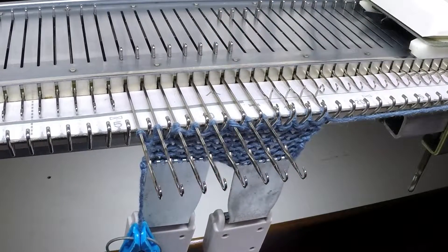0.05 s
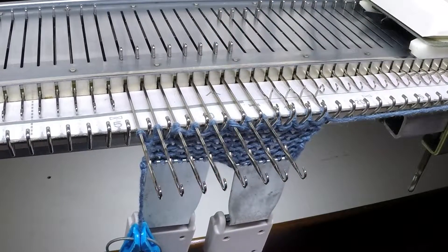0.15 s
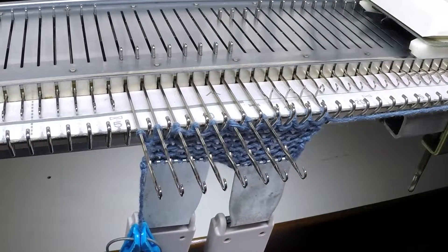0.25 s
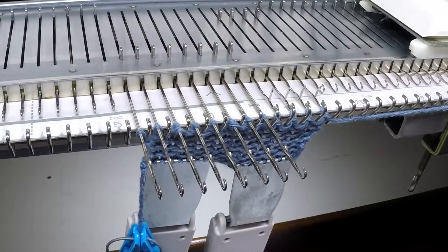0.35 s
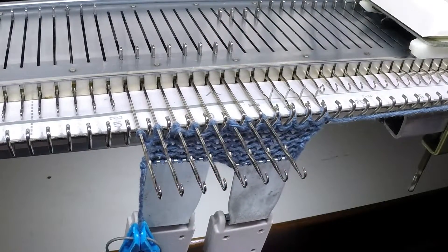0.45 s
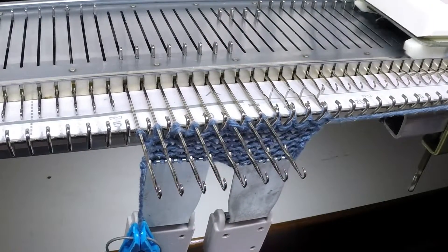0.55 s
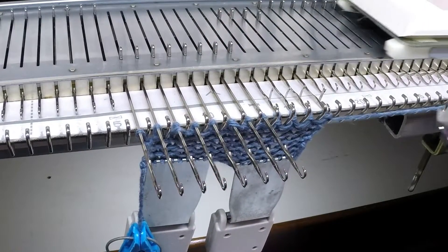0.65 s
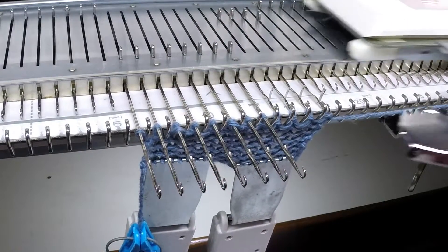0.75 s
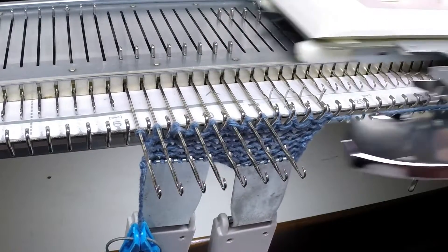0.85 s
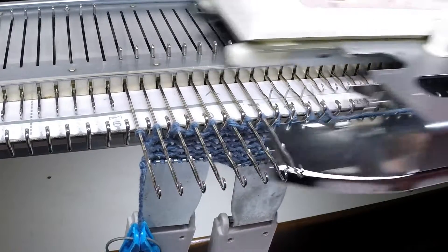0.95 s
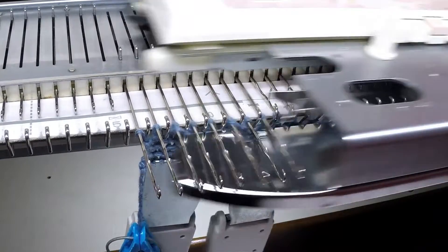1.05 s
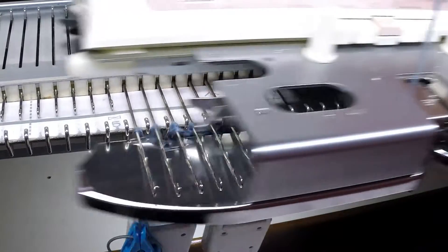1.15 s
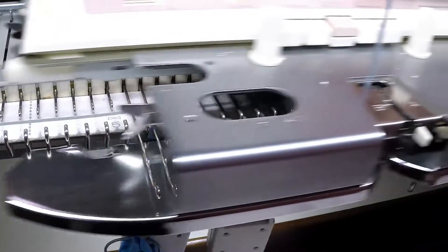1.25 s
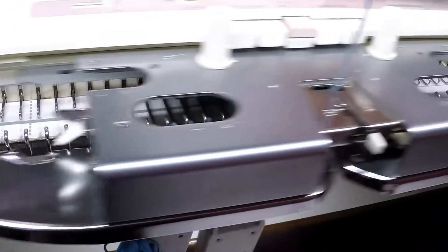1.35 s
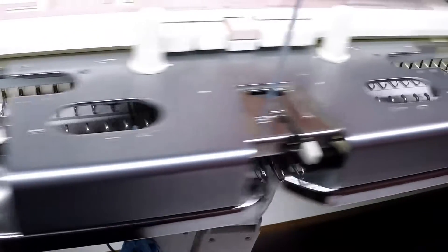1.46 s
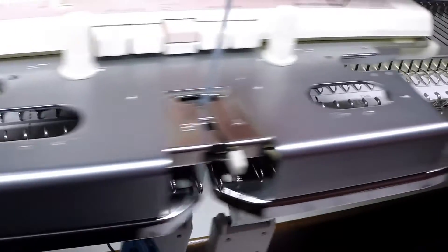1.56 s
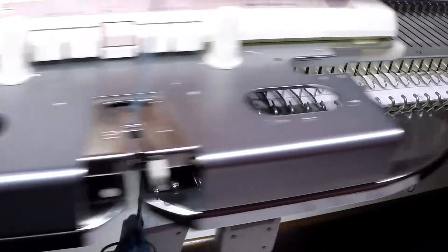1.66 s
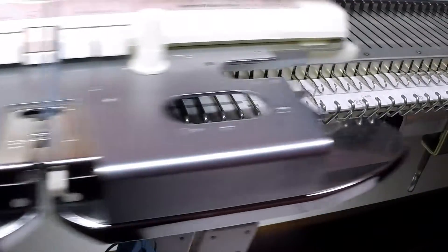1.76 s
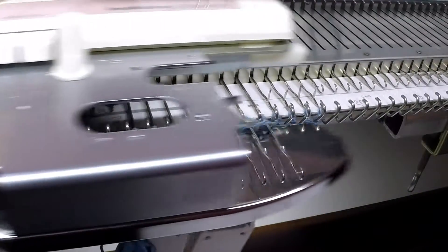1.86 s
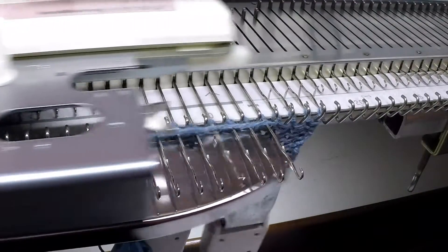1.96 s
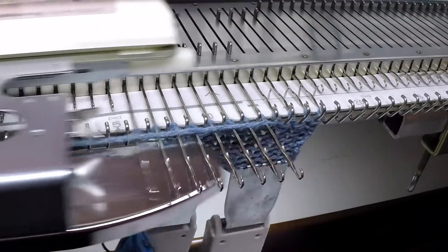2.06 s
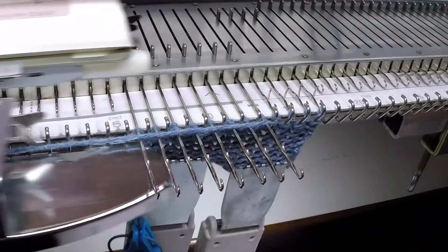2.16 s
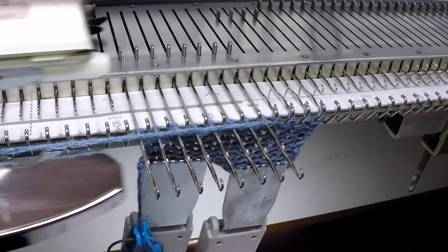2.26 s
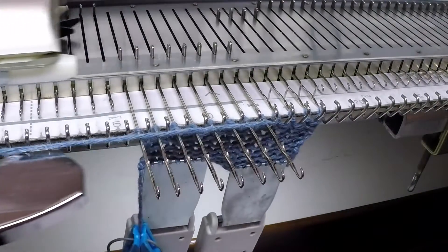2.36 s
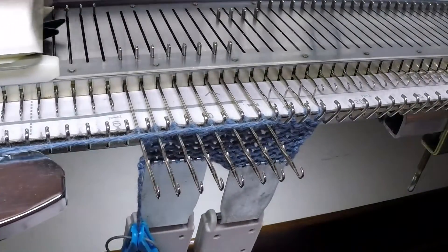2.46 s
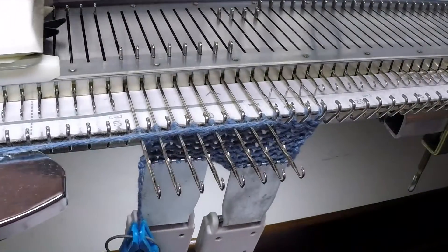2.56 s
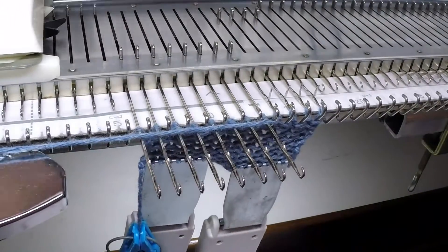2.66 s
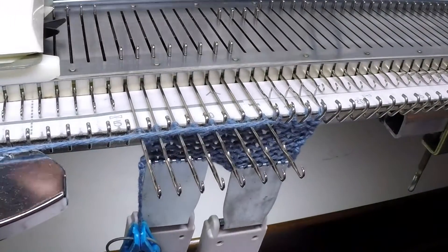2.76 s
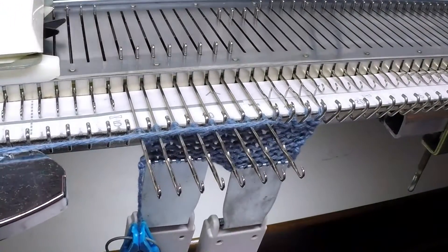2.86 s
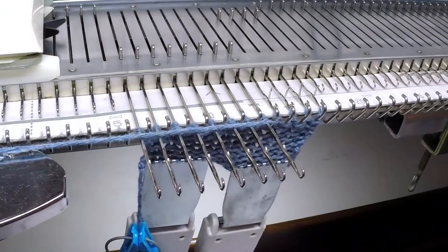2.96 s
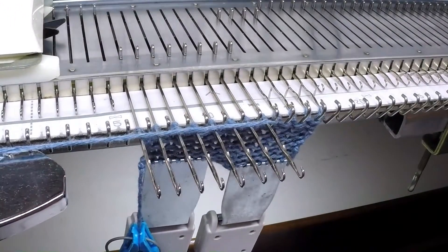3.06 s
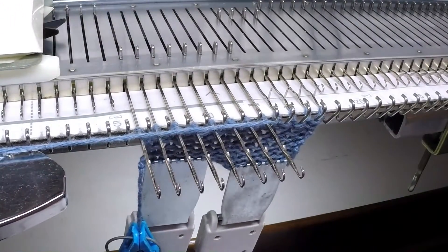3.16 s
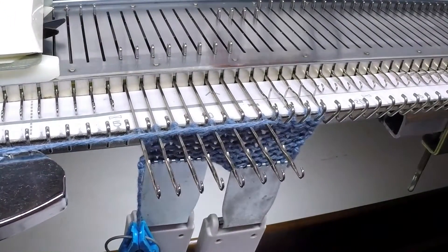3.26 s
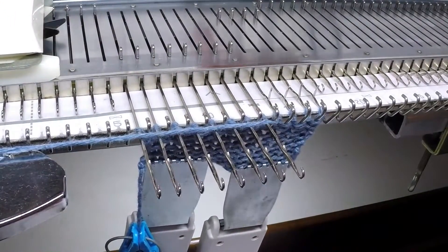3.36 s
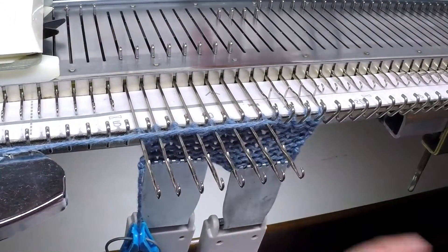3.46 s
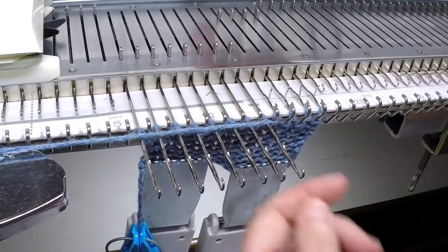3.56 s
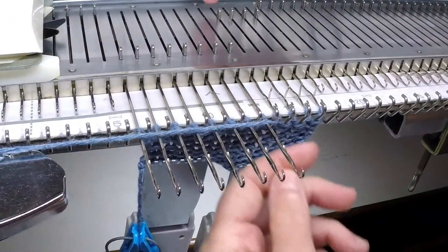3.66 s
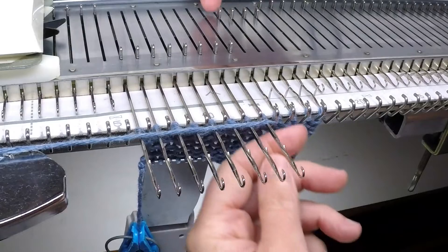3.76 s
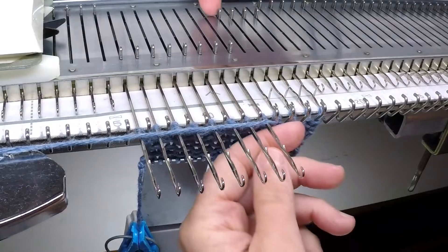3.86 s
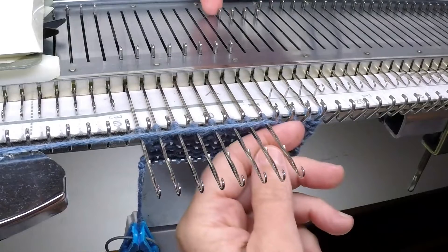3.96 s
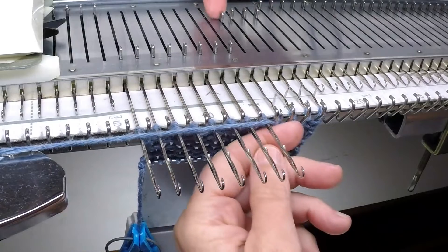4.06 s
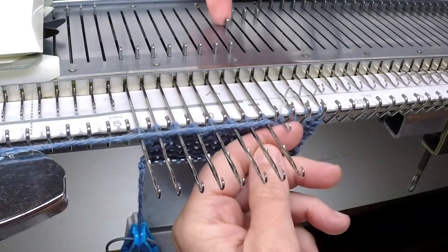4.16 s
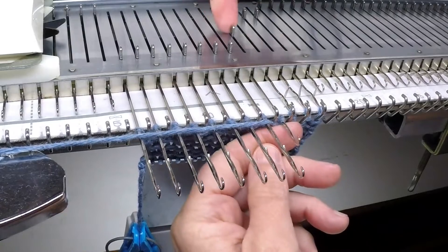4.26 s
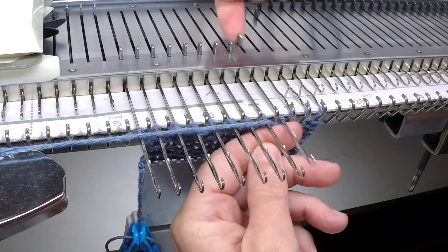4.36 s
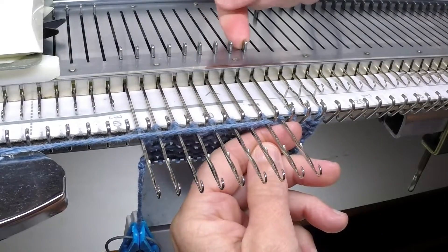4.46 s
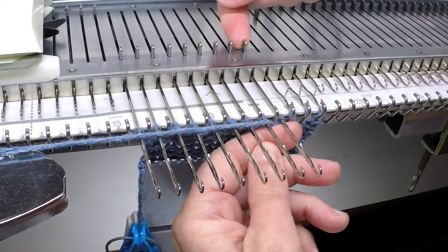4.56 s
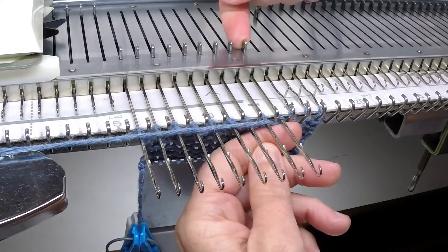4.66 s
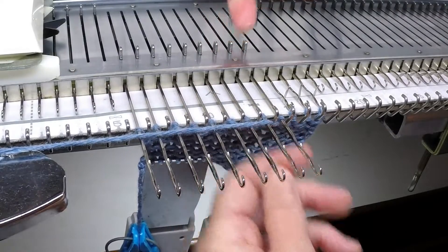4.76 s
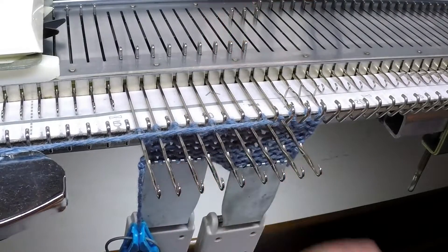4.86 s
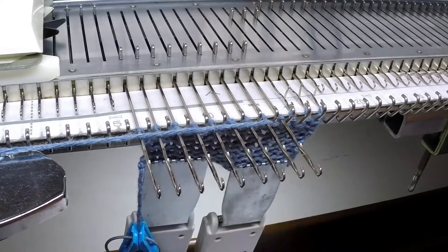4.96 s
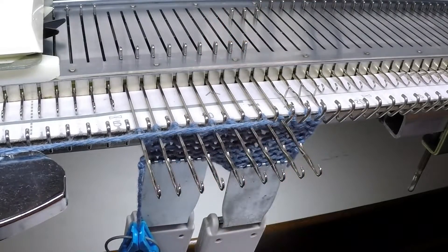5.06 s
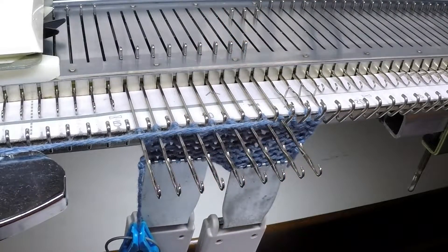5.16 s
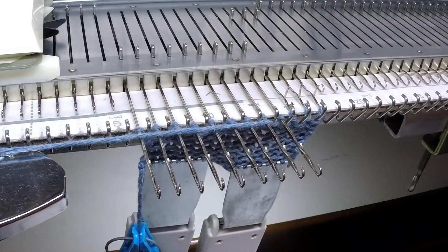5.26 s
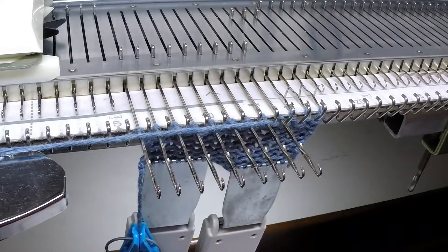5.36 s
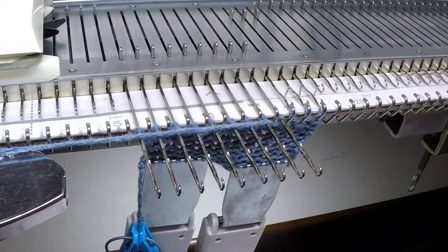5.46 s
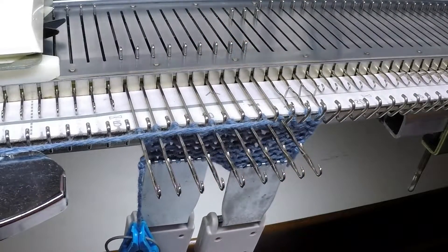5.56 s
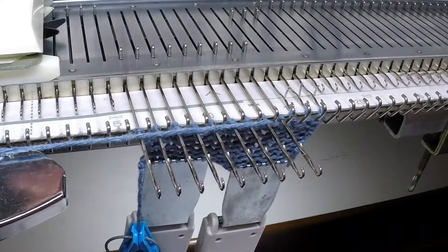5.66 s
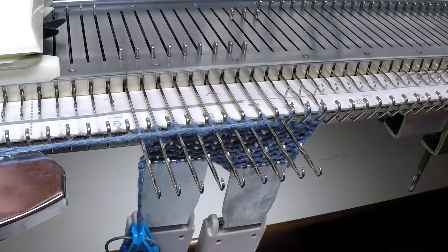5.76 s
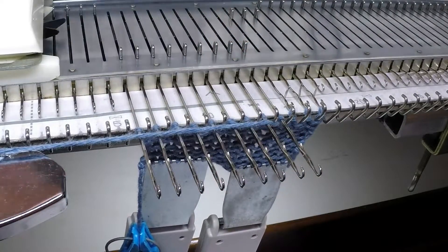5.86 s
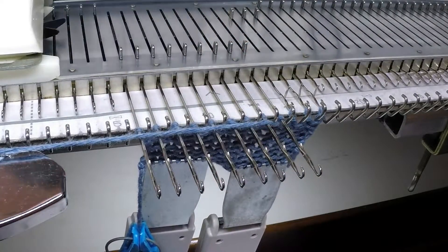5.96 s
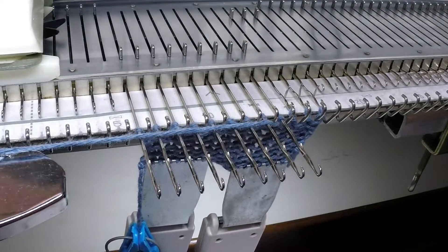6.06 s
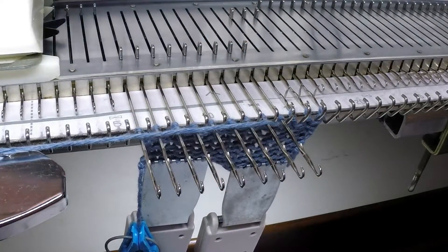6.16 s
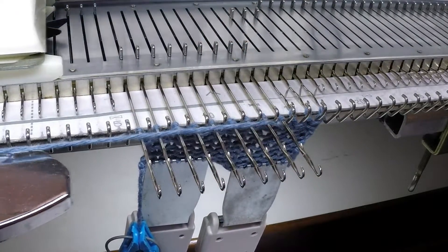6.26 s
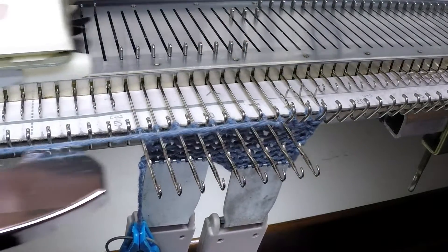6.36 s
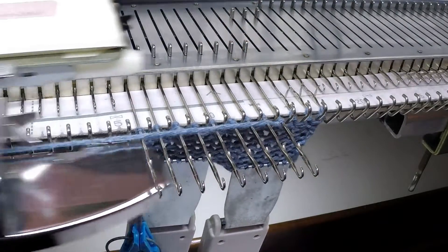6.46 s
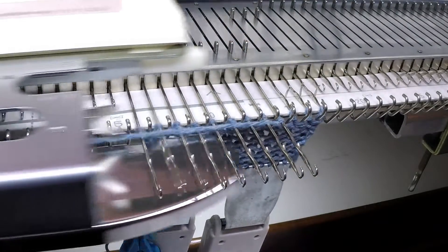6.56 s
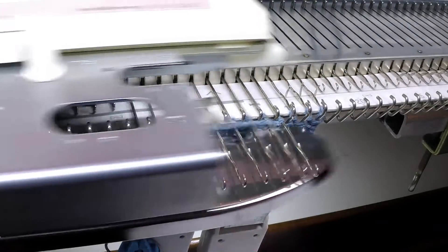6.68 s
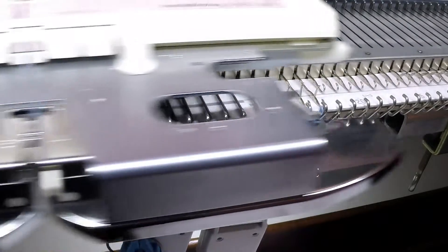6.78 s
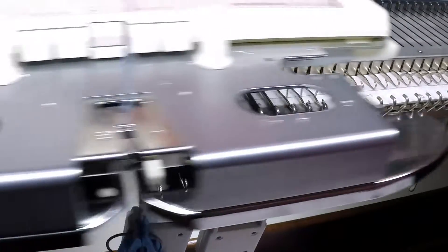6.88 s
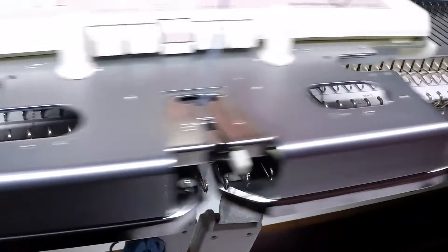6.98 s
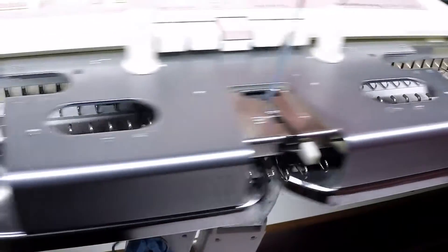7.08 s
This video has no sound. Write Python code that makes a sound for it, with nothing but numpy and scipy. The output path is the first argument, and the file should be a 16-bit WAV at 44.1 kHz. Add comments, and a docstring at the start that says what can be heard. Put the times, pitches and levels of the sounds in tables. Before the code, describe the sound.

Close to the microphone indoors, a hand-pushed carriage rubs faintly on its rail, then clatters over steel needles in a fast, bright metallic rattle with hollow booms and singing bed. It thins to small ticks. In the quiet room a sleeve brushes faintly and a few soft clicks lead to one sharp needle flick. After a pause the carriage starts back, rattling until the end.

```python
"""A hand pushes a knitting carriage along a steel needle bed, close to the microphone, rests it, and pushes it back.
Cams knock the needles one after another; each knock is a crack, two needle rings, a wash of bed modes
and a boom of the hollow carriage shell. Random ticks, singing bands of noise and brushed hooks fill the passes.
Between the passes a finger flicks single needles forward. Behind it all the table shakes, a sleeve brushes
and a quiet room rumbles: all three are shaped noise."""
import sys
import numpy as np
from scipy import signal
from scipy.io import wavfile
from scipy.ndimage import uniform_filter1d

SR = 44100
rng = np.random.default_rng(int(sys.argv[2]) if len(sys.argv) > 2 else 0)


def to_wav(s):
    """Save 16-bit WAV."""
    ch = np.atleast_2d(s).T  # columns
    pcm = np.round(np.clip(ch, -1, 1) * 32767)  # PCM
    wavfile.write(sys.argv[1], SR, pcm.astype(np.int16))


N = 313992  # length in samples

# All table levels are relative: each layer may add its own trim.
# Needle knocks: t/s, level/dB, low ring f/Hz, high ring f/Hz, bed clack level/dB, low ring level/dB
# (the last two are counted from the level of the knock)
KNOCKS = [(0.678, -38, 3120, 8750, -9, -12), (0.707, -40, 1210, 7530, -16, -8),
          (0.7292, -42.5, 3100, 6500, -5, -3), (0.7801, -43, 2760, 6500, -5, -1),
          (0.9302, -29.5, 2330, 7600, -8.5, -11), (0.9939, -8, 3610, 5900, -15.5, -12),
          (1.0332, -13.5, 1650, 6840, -17.5, -10), (1.0425, -9.5, 3380, 6840, -15, -16),
          (1.061, -7, 1750, 8100, -15.5, -10), (1.1087, -8, 3500, 5710, -21, -12),
          (1.1308, -10, 3320, 4470, -20, -4), (1.1494, -8, 1580, 8200, -14.5, -12),
          (1.1709, -9, 3300, 8160, -13.5, -6), (1.1905, -8.5, 3300, 6630, -15, -11),
          (1.213, -7.5, 2840, 6900, -14, -13), (1.2306, -9, 3290, 9160, -11.5, -8),
          (1.2375, -7.5, 3130, 7850, -22, -10), (1.257, -1.5, 2280, 8300, -15, -16),
          (1.2772, -8, 2830, 8600, -13, -8), (1.285, -5, 3290, 8370, -28, -10),
          (1.3074, -7, 3260, 5690, -16, -10.5), (1.3177, -8, 3010, 8400, -15, -6),
          (1.338, -10, 1290, 8100, -16, -5), (1.3677, -8.5, 3200, 7800, -16.5, -3),
          (1.4014, -8.5, 2980, 5650, -18.5, -4), (1.433, -10.5, 3160, 7000, -26, -0.5),
          (1.4462, -12, 3200, 8000, -19, -13), (1.4682, -6, 3700, 7400, -19, -13),
          (1.4815, -3.5, 3770, 8400, -20, -13), (1.4993, -17, 2130, 8500, -28, -6),
          (1.5264, -7.5, 2640, 8690, -16, -12), (1.5547, -8.5, 1230, 7620, -8.5, -18),
          (1.6127, -7.5, 2350, 6000, -15, -24), (1.6432, -7.5, 3630, 5760, -18, -19),
          (1.6724, -10, 2190, 7740, -16, -8), (1.712, -3.5, 2130, 3980, -19.5, -3.5),
          (1.728, -7.5, 1470, 6620, -16, -11), (1.7582, -8.5, 1525, 8100, -17, -9),
          (1.8009, -14, 2620, 9500, -26, -10), (1.8205, -7.5, 1425, 8300, -13.5, -9.5),
          (1.8442, -8.5, 1460, 7490, -19, -11), (1.8684, -12.5, 1284, 8600, -12, -3.5),
          (1.8956, -9.5, 1480, 7550, -13.5, -11), (1.92, -19, 2640, 8850, -21, 2),
          (1.952, -17, 2770, 8000, -11, -4), (1.9793, -14, 2710, 5360, -20, -13),
          (2.0035, -13.5, 3540, 4570, -20, -7), (2.0314, -16, 3060, 4470, -16, -9),
          (2.0584, -15, 3010, 4420, -22, -10), (2.0833, -16, 3060, 4450, -17, -8),
          (2.1143, -14.5, 2780, 5700, -17.5, -13), (2.135, -13.5, 3140, 7680, -20, -15),
          (2.144, -19.5, 3600, 7490, -19, -7), (2.166, -19.5, 3510, 7170, -13.5, -14),
          (2.247, -36, 3500, 3970, -4, -11), (2.2596, -24.5, 2270, 7870, -12, -1.5),
          (2.3028, -44, 1910, 8470, -9, -4), (2.3287, -41, 1660, 6580, -10, 0),
          (2.377, -40, 2120, 5500, -9.5, -5), (2.4663, -45.5, 2930, 5070, -4.5, 0),
          (2.5244, -48, 1980, 6100, -14, -5), (2.6234, -36, 1598, 8930, -10, -5),
          (3.761, -50, 2470, 4910, -3.5, -8.5), (4.138, -34, 1495, 4060, -13, -9.5),
          (4.2885, -42.5, 1350, 7640, -12.5, -8), (4.4066, -50, 1256, 4870, -12.5, -7),
          (4.485, -13, 2565, 8220, -13, -7), (6.4388, -40.5, 3140, 8390, -9, -10),
          (6.557, -29.5, 3230, 4900, -11.5, -9), (6.5994, -24.5, 3460, 4700, -13.5, 0),
          (6.6334, -6, 3110, 7860, -20.5, -9), (6.6575, -8, 3040, 7740, -18.5, -11),
          (6.6831, -9.5, 2980, 8110, -33, -16), (6.7052, -9, 3050, 7520, -18.5, -14),
          (6.7279, -10.5, 2860, 7640, -22, -8), (6.7501, -7.5, 2710, 7700, -20, -17),
          (6.769, -9, 2550, 9080, -21, -17), (6.7898, -8, 2450, 7840, -18, -15),
          (6.8438, -17.5, 2430, 7370, -12, -12), (6.8741, -14.5, 1710, 7400, -11, 0),
          (6.896, -10.5, 2544, 9320, -12, -7), (6.9224, -17, 2600, 4030, -10, -6),
          (6.9476, -16.5, 2550, 9400, -14, -8), (6.9718, -15, 2570, 5390, -6.5, -8),
          (6.9976, -14, 2650, 4470, -10.5, -8), (7.0232, -16, 1250, 4550, -8, -9),
          (7.0489, -13.5, 2410, 8100, -8, -7), (7.0749, -7.5, 2540, 5900, -12, -2),
          (7.1044, -14, 2630, 8100, -15, 1)]
# Carriage in motion, one list for each pass: t/s, rattle level/dB, shell level/dB
PASSES = [
    [(0.5, -72, -80), (0.74, -55, -59), (0.99, -51.5, -46.5), (0.998, -43.5, -41), (1.07, -23, -37),
     (1.143, -26, -42), (1.25, -22.5, -38), (1.43, -26.5, -44), (1.577, -21.5, -32), (1.866, -28.5, -31.5),
     (1.94, -32, -39.5), (2.155, -38.5, -37), (2.3, -59, -58.5), (2.4, -63.5, -55.5), (2.615, -67, -68),
     (2.63, -75, -46), (2.75, -83, -70.5)],
    [(6.25, -78.5, -72.5), (6.553, -54, -58), (6.56, -41, -46.5), (6.628, -36, -45), (6.636, -37, -30),
     (6.72, -34.5, -31.5), (6.841, -28.5, -31), (6.91, -28, -30.5), (6.978, -27.5, -29.5),
     (7.115, -23.5, -32)],
]
# Colour of the dense wash of steel modes: f/Hz, level per Hz/dB
STEEL_COLOUR = [(380, -34), (650, -0.5), (742, -15.5), (869, -9), (1100, -6), (1290, -13), (1920, -6),
                (2160, -10), (3220, -9.5), (4250, -9.5), (8010, -5.5), (9380, -7.5), (11000, -24.5),
                (15300, -13)]
# How long that wash lasts, before each layer shortens it: f/Hz, 60 dB decay time/s
STEEL_DECAY = [(700, 0.25), (2100, 0.15), (5500, 0.089), (14600, 0.072)]
# Clearest modes of the needle bed: f/Hz, level/dB, 60 dB decay time/s (later capped and shortened)
BED_MODES = [(910, -19.5, .14), (1080, -17, 0.078), (1296, -2, 0.14), (1514, 2, 0.24), (2280, -7, .12),
             (2570, 0.5, 0.11), (2840, -1, 0.077), (2980, 3.5, 0.036), (3040, -11.5, 0.068),
             (3590, -1.5, .1), (3950, -6.5, 0.27), (4550, -2, 0.0817), (5050, -17, .07), (5850, 3, 0.054),
             (5680, 4, 0.037), (6440, -21, 0.077), (7700, -3, .06), (7100, -2, 0.059), (7880, 4, 0.037),
             (7750, 3.5, .07), (8550, 4.5, 0.058), (8790, -7.5, 0.07)]
# Modes of the hollow carriage shell: f/Hz, level/dB, 60 dB decay time/s
SHELL_MODES = [(420, -4, .09), (441, 0, .11), (468, -2, .09), (500, -2, .1), (545, -7, .08)]
# Band the shell is heard in: lower edge f/Hz, upper edge f/Hz
SHELL_BAND = [370, 700]
# Sinker plate singing as it rubs over the needles: t/s, level/dB, pitch f/Hz
PLATE_SONG = [
    [(1.1, -33, 3240), (1.306, -29.5, 3120), (1.46, -31, 3150)],
    [(1.93, -41, 2970), (2.13, -34, 3050), (2.26, -45.5, 3544)],
    [(6.33, -87, 3040), (6.358, -64.5, 3040), (6.553, -51, 3080), (6.56, -44, 3130), (6.6, -41, 3064),
     (7.12, -26, 2668)],
]
# Bed humming under the yarn feeder: t/s, level/dB, pitch f/Hz
FEEDER_SONG = [
    [(1.0, -33, 1428), (1.14, -37.5, 1400), (1.27, -17.5, 1290), (1.43, -37, 1300), (1.58, -24, 1323),
     (1.74, -26.5, 1479), (1.88, -30, 1424), (1.93, -38, 1329)],
    [(6.63, -35, 1634), (6.86, -38.5, 1594), (6.89, -33, 1648), (7.12, -30, 1416)],
]
# Latch brushes dragging over the needle hooks: t/s, level/dB
BRUSH_DRAG = [
    [(1.94, -39.5), (2.16, -42.5), (2.26, -63)],
    [(6.56, -52), (6.64, -42.5), (7.12, -47)],
]
# Rings of the brushed hooks: f/Hz, width f/Hz, level/dB
HOOK_RINGS = [(4450, 300, -0.042), (5440, 170, -1), (7560, 555, 0.95)]
# Empty carriage rubbing on its rail before it meets the needles: t/s, level/dB, pitch f/Hz
RAIL_SONG = [
    [(.74, -62, 2590), (.92, -57, 2450), (.985, -55, 2550)],
]
# Table shaken by the push: t/s, level/dB
TABLE_SHAKE = [
    [(0.6, -59.5), (1.28, -37), (2.7, -54)],
    [(6.4, -58.5), (6.844, -37.5), (7.12, -42.5)],
]
# Modes of the table: f/Hz, level/dB, 60 dB decay time/s
TABLE_MODES = [(72, 3, 0.26), (117, -3.5, 0.18), (165.9, -7, 0.24), (199.6, 2, 0.19)]
# Cloth of a sleeve: t/s, level/dB
SLEEVE_BRUSH = [(3.25, -78.5), (3.56, -63.5), (3.85, -75)]
# Colour of the room noise: f/Hz, level per Hz/dB
ROOM_COLOUR = [(8.8, -30), (15, 0.5), (70, -2), (93, -5), (148, -9.5), (236, -13), (387, -17.5),
               (548, -17.5), (732, -28.5), (822, -24), (2620, -30), (5110, -33), (15400, -37.5)]
# Thin steady hiss in the treble: f/Hz, width f/Hz, level/dB
TREBLE_HISS = (4980, 120, -78)

ROOM_DB = -52.5  # rms level of the room noise, without the thin treble hiss
TOP_HZ = 15270  # the whole sound stops steeply above this
# Parts of a clear knock, counted from its level; softer knocks sizzle more
HIGH_RING_DB, SIZZLE_DB, SOFT_SIZZLE_DB_PER_DB = -5, 0, 0.1782
# Small ticks: added to the clack of the last knock; top sizzle
CHATTER_CLACK_DB, CHATTER_SIZZLE_DB = 7.5, -3


def knocks():
    """The clear single knocks: a short crack, two rings of the needles and the answer of the bed."""
    seconds, db, low_hz, high_hz, clack_db, low_db = np.transpose(KNOCKS)
    at = (seconds * SR).astype(int)
    sizzle_db = SIZZLE_DB + SOFT_SIZZLE_DB_PER_DB * (db.max() - db)
    bed = steel(at, db, low_hz, high_hz, clack_db + 14.0, sizzle_db,
                dense_db=-19.0, modes_db=-29.5, focus_db=3.77, scatter_db=2.5, quick=0.94)
    crack = fade(train(at, undb(db - 12.0) ** 2), 0.0069) * hiss(7200, 8300)
    low = needles(at, low_hz, db + low_db, t60=0.056, spread=0.053)
    high = needles(at, high_hz, db + HIGH_RING_DB, t60=0.031, spread=0.02)
    return bed + crack + low + high


def needles(at, hz, db, t60, spread):
    """The struck needle and its neighbours ring as a close cluster at a pitch set by their free length."""
    length = 4096  # samples of each ring
    out, t = np.zeros(N + length), np.arange(length) / SR
    envelope = np.exp(-np.log(1000) * t / t60) * (1 - np.exp(-t / .0006))  # quick rise, then decay
    luck = rng.random((len(at), 2, 4, 1))  # detuning and phase of four needles for each knock
    for start, pitch, size, (detune, phase) in zip(at, hz, undb(db), luck):
        needle_hz = pitch * (1 + spread * (2 * detune - 1))
        cluster = np.sin(2 * np.pi * (needle_hz * t + phase)).mean(axis=0)
        out[start:start + length] += size * cluster * envelope
    return out[:N]


def steel(at, db, low_hz, high_hz, clack_db, top_db, dense_db, modes_db, focus_db, scatter_db, quick):
    """Blows on the bed: a dense wash of modes that dies by band, and the clearest modes on their own."""
    out = np.zeros(N)

    def near(hz):
        """The place of the blow favours modes close to one low and one high ring."""
        return sum(np.exp(-(np.log2(hz / centre) / .09) ** 2) for centre in (low_hz, high_hz))

    for hz in 700 * 2 ** np.arange(0, 4.55, .25):  # quarter-octave steps
        band_db = shape(STEEL_COLOUR, hz) + 10 * np.log10(hz / 4000)  # wider bands hold more power
        size_db = db + dense_db + band_db + part(hz, clack_db, top_db) + 2.3 * near(hz)
        size = undb(size_db + scatter_db * rng.standard_normal(len(at)))
        envelope = fade(train(at, size ** 2), quick * shape(STEEL_DECAY, hz))
        out += envelope * hiss(hz, hz / 5.8)

    for hz, mode_db, t60 in BED_MODES:
        size_db = db + modes_db + mode_db + part(hz, clack_db, top_db) + focus_db * near(hz)
        size = undb(size_db + scatter_db * rng.standard_normal(len(at)))
        late = rng.integers(0, 90, len(at))  # samples: the modes start slightly apart
        sign = rng.choice([-1, 1], len(at))
        out += ring(train(at + late, size * sign), hz, quick * min(t60, .13))
    return out


def part(hz, clack_db, top_db):
    """Where a blow lands sets how much low clack and top sizzle it has against the middle."""
    clack = clack_db * np.clip(np.log2(2400 / hz) / .4, 0, 1)
    sizzle = top_db * np.clip(np.log2(hz / 9500) / .2, 0, 1)
    return clack + sizzle


def rattle():
    """Loose needles, latches and brushes chatter densely under the moving cams; plate, bed and shell sing along."""
    db = track(PASSES, order=1)
    at = np.sort(rng.integers(0, N, size=3000))
    size_db = -3.0 * np.log(rng.random(len(at)) + .02)  # many small ticks, few large ones
    # small ticks ring like the last clear knock: same cam, same stretch of bed
    knock_list = np.array(KNOCKS)
    last_index = np.searchsorted(knock_list[:, 0] * SR, at) - 1
    last = knock_list[np.clip(last_index, 0, None)]
    chatter = steel(at, db[at] + size_db, last[:, 2], last[:, 3], last[:, 4] + CHATTER_CLACK_DB,
                    CHATTER_SIZZLE_DB, dense_db=-12, modes_db=-25.5, focus_db=7.7, scatter_db=3.0, quick=0.61)
    boom = shell(at, size_db)
    plate = undb(-5.0) * song(PLATE_SONG, width_hz=260, grain_db=2.1)
    feeder = undb(-8) * song(FEEDER_SONG, width_hz=265, grain_db=3.14)
    return chatter + boom + plate + feeder


def shell(at, size_db):
    """The hollow carriage booms with every clear knock and, more softly, with the small ticks."""
    seconds, db, clack_db = np.array(KNOCKS)[:, [0, 1, 4]].T
    knock = (seconds * SR).astype(int)
    ticks = train(at, undb(size_db) * rng.choice([-1, 1], len(at)))
    force = train(knock, np.full(len(knock), undb(9))) + ticks
    moving = track(PASSES, order=1) > -100
    force = force * undb(track(PASSES, order=2) - 15.5) * moving
    # a low clack reaches it through the bed, also at rest
    force = force + train(knock, undb(db + clack_db - 26.0))
    band = signal.butter(2, SHELL_BAND, "band", fs=SR, output="sos")
    return signal.sosfilt(band, body(force, SHELL_MODES))


def brushes():
    """Bristles keep the hooks ringing, and every knock shakes them up."""
    at = (np.array(KNOCKS)[:, 0] * SR).astype(int)
    jolt = 1 + 0.86 * fade(train(at, np.ones(len(at))), 0.075)
    hooks = sum(undb(db) * hiss(hz, width) for hz, width, db in HOOK_RINGS)
    return undb(track(BRUSH_DRAG, order=1) - 3.5) * jolt * hooks


def rail():
    """The empty carriage rubs on its rail: a soft band of noise that follows a pitch."""
    return song(RAIL_SONG, width_hz=419, grain_db=1.79)


def song(tables, width_hz, grain_db):
    """A rubbed part: a narrow band of noise that follows its pitch and catches unevenly."""
    noise = rng.standard_normal(N) + 1j * rng.standard_normal(N)
    slow = signal.lfilter([1], [1, -np.exp(-np.pi * width_hz / SR)], noise)
    carrier = np.exp(2j * np.pi * np.cumsum(track(tables, order=2)) / SR)  # moves the noise up to the pitch
    tone = (slow * carrier).real
    return undb(track(tables, order=1) + grain_db * walk(60)) * unit(tone)


def table():
    """The push rocks the table the machine is clamped to: noise drives a few low modes."""
    shaking = unit(body(rng.standard_normal(N), TABLE_MODES))
    return undb(track(TABLE_SHAKE, order=1) - 4.0) * shaking


def sleeve():
    """Cloth brushes softly as the hands come in: broad noise with an uneven level."""
    return undb(track([SLEEVE_BRUSH], order=1) + 2 * walk(17)) * hiss(4500, 8000)


def room():
    """Half-octave bands of rumble and hiss; the bass wanders most, the treble is smoother."""
    out, swell = 0, .8 * walk(.7)  # all bands share the swell
    for hz in 18 * 2 ** np.arange(0, 10, .5):
        steadiness = np.clip(1 - np.log(hz / 100) / 6, .2, 1)  # smaller towards the treble
        wander = (swell + 1.53 * walk(3.66)) * steadiness
        out = out + undb(shape(ROOM_COLOUR, hz) + 10 * np.log10(hz) + wander) * hiss(hz, hz / 2.82)
    hz, width, db = TREBLE_HISS
    return undb(ROOM_DB) * unit(out) + undb(db) * hiss(hz, width)


def undb(db):
    """Decibels to gain."""
    return 10 ** (np.asarray(db) / 20)


def unit(x):
    """Scale to rms 1."""
    return x / np.sqrt(np.mean(x ** 2))


def shape(curve, hz):
    """Read a table of f/Hz and value on a log-frequency axis."""
    points = np.array(curve)
    return np.interp(np.log(hz), np.log(points[:, 0]), points[:, 1])


def track(tables, order):
    """One column of timed tables for every sample; the first level falls silent outside its spans."""
    spans = []
    for t in tables:
        before = [t[0][0] - .004, -110, *t[0][2:]]
        after = [t[-1][0] + .004, -110, *t[-1][2:]]
        spans.append([before, *t, after])
    rows = np.concatenate(spans)
    return np.interp(np.arange(N) / SR, rows[:, 0], rows[:, order])


def hiss(hz, width):
    """Noise in one band, rms 1."""
    edges = [hz - width / 2, min(hz + width / 2, .49 * SR)]
    band = signal.butter(2, edges, "band", fs=SR, output="sos")
    return unit(signal.sosfilt(band, rng.standard_normal(N)))


def walk(rate):
    """Random levels held 1 / rate s and smoothed twice; spread 1."""
    k = int(SR / rate)
    steps = np.repeat(rng.standard_normal(N // k + 1), k)
    return unit(uniform_filter1d(uniform_filter1d(steps, k), k)[:N])


def train(at, size):
    """Impulses at the given samples, on a tiny offset that keeps silent filters quick."""
    return np.bincount(at, size, N)[:N] + 1e-18


def fade(power, t60):
    """Envelope of unrelated blows: powers add, build for about a millisecond and die away."""
    rise = .0008  # s
    for time in (t60 / np.log(1e6), rise):
        power = signal.lfilter([1], [1, -np.exp(-1 / (time * SR))], power)
    return np.sqrt(power / (rise * SR))


def ring(x, hz, t60):
    """One mode: impulses start decaying sines."""
    r, w = np.exp(-np.log(1000) / (t60 * SR)), 2 * np.pi * hz / SR
    return signal.lfilter([0, r * np.sin(w)], [1, -2 * r * np.cos(w), r * r], x)


def body(x, modes):
    """All modes of one object, struck by the same force."""
    return sum(undb(db) * ring(x, hz, t60) for hz, db, t60 in modes)


def scene():
    """Machine, hands and room at one microphone."""
    machine = knocks() + rattle() + brushes() + rail()
    return (machine + table() + sleeve() + room())[None]


def record(dry):
    """A steep low-pass filter cuts the top."""
    return signal.sosfilt(signal.ellip(10, .3, 60, TOP_HZ, fs=SR, output="sos"), dry)


dry = scene()
out = record(dry)
to_wav(out)
```